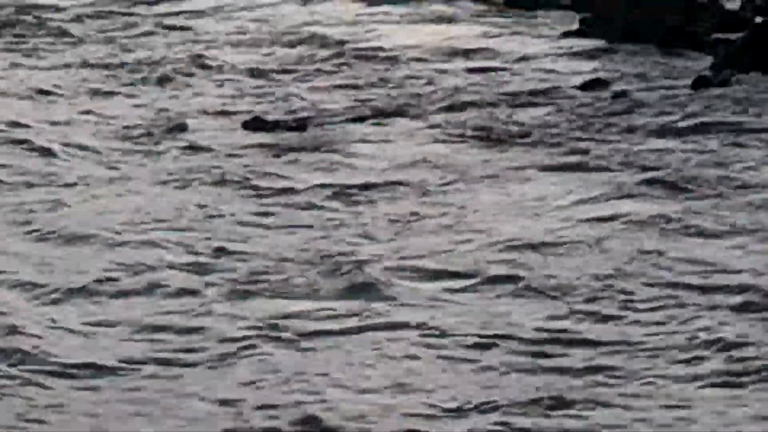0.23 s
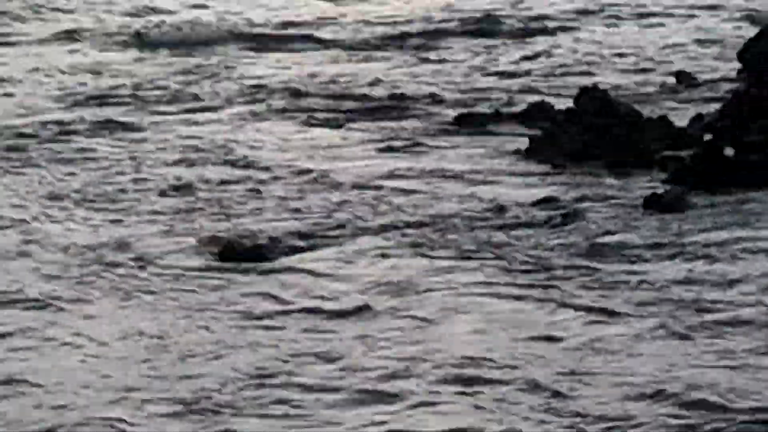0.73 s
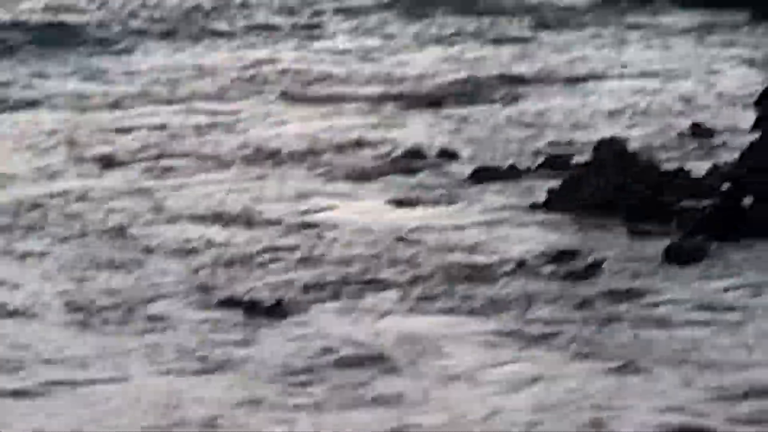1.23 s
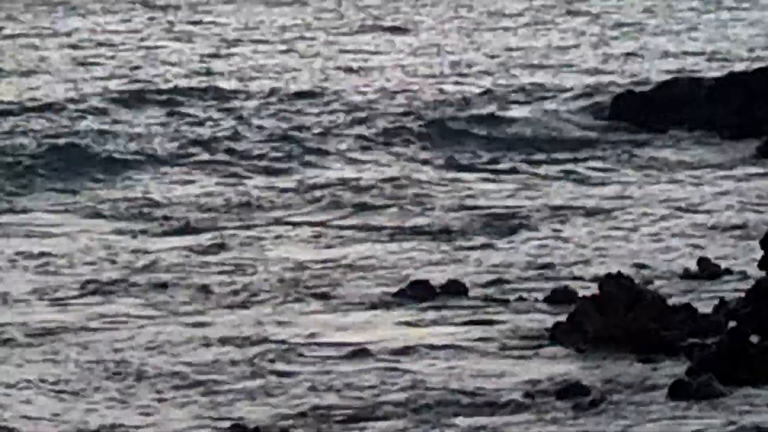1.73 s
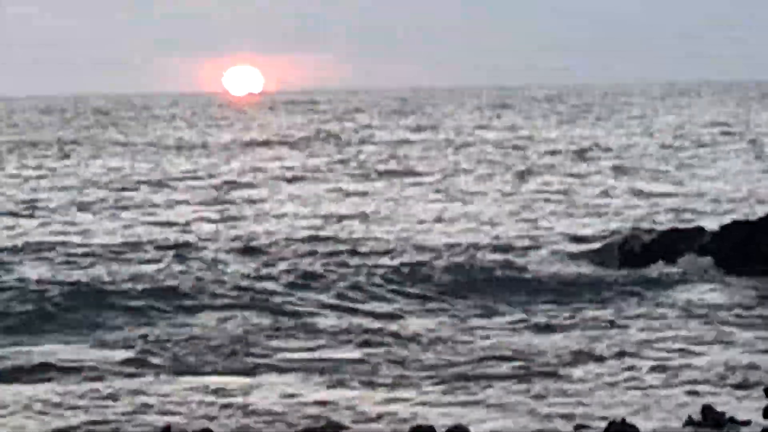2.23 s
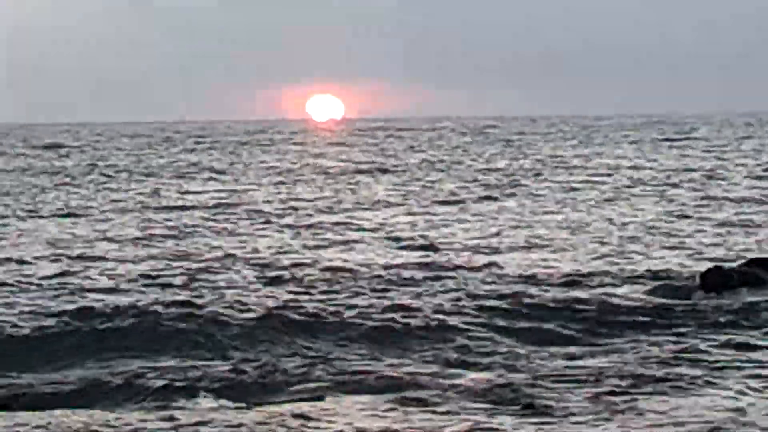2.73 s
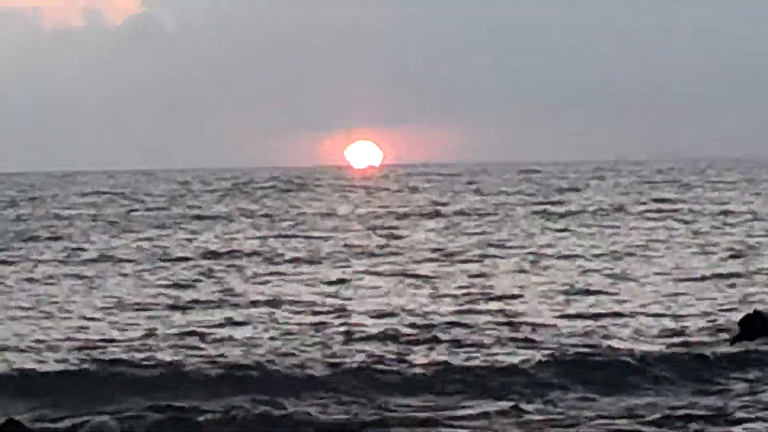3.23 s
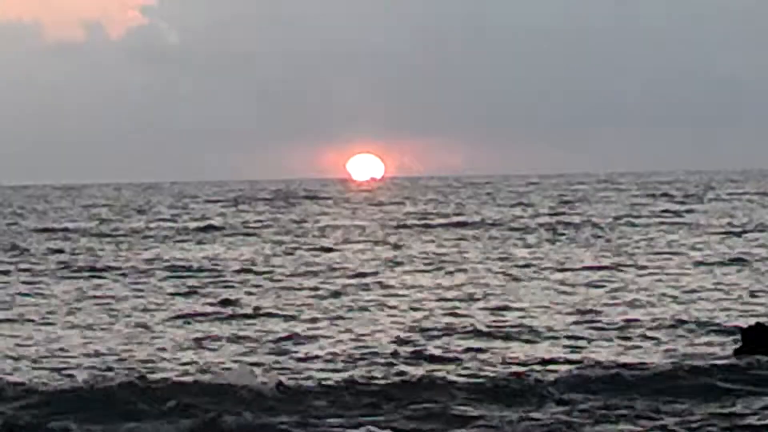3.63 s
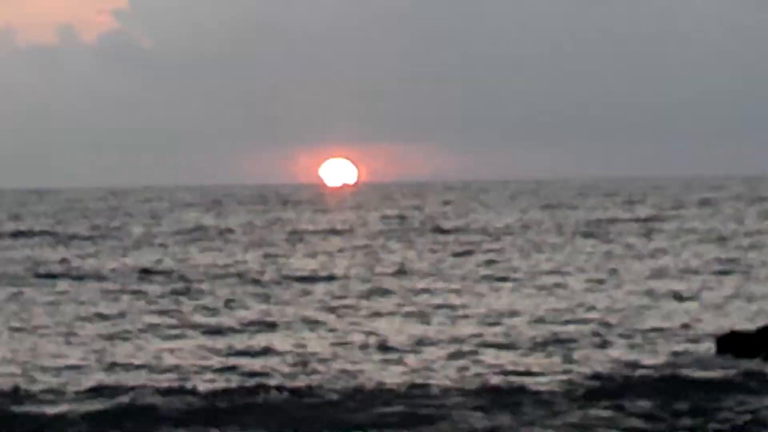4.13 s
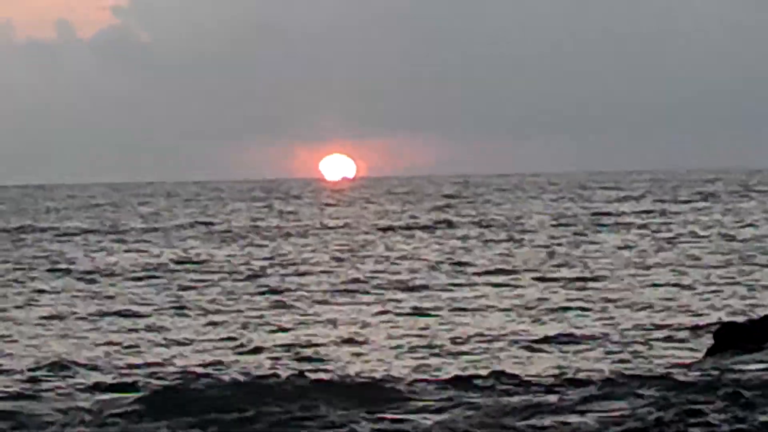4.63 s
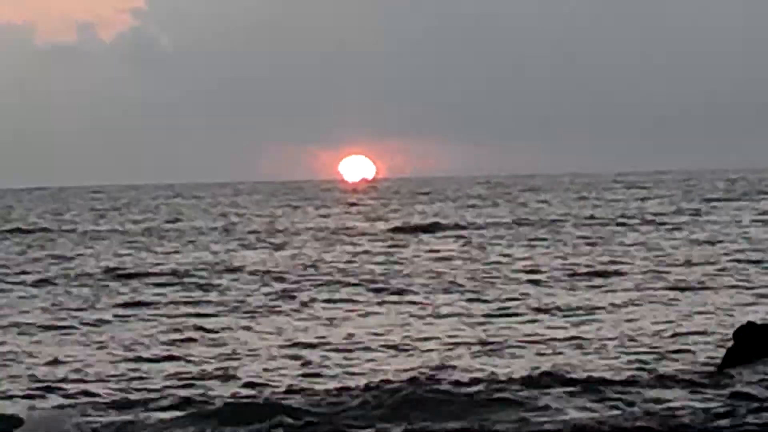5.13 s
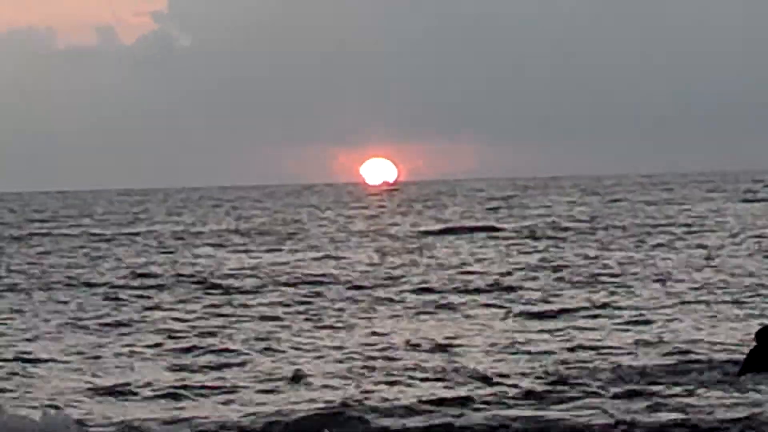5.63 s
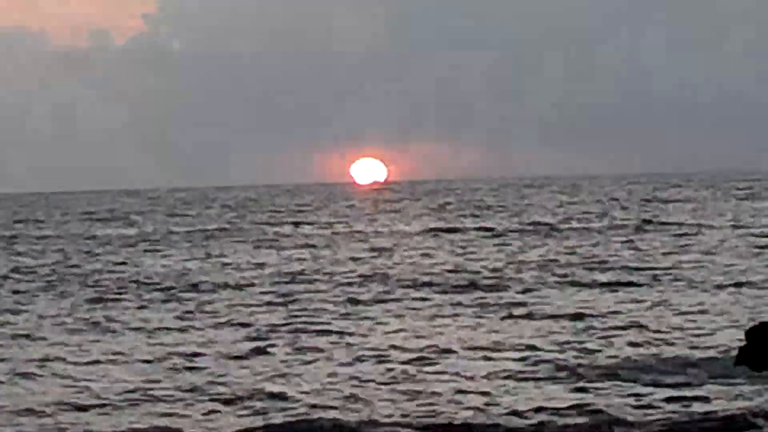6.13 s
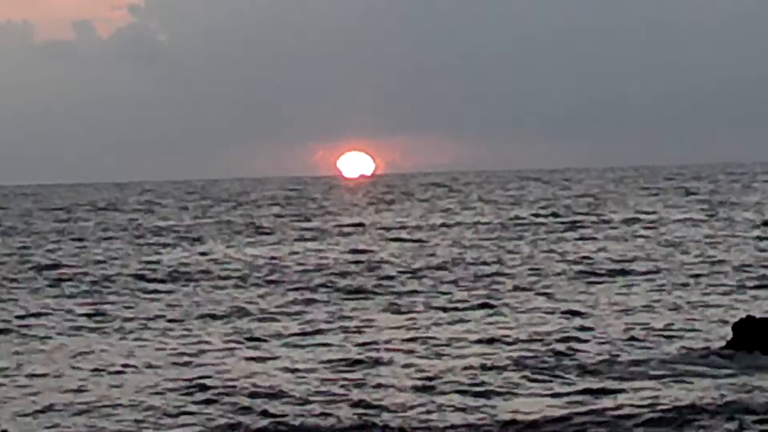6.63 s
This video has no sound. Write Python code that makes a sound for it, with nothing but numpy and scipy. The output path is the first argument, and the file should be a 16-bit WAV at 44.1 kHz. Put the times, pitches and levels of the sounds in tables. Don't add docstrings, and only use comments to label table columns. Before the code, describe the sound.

Surf on a rocky shore, heard close and wide in stereo outdoors, with only a trace of low breeze. At 0 s a strong foamy wash is already running; it sinks to a thin, bubbling trickle by 0.9 s, with faint ticks around 0.6 s. High watery drips sound at about 1.0 s and in a quick cluster at 1.75-1.85 s. A short wavelet slaps rock at 1.7 s, with another at 2.3 s; crisp ticks come at 1.9 and 2.35 s, and the sharpest at 2.86 s, after which the level ducks and recovers. Gurgling drains continue, quietest near 3.4 s with small soft plops. From 3.7 s the water gathers. A bright plop at 4.8 s, a hollow one at 5.0 s, light slaps near 5.7 s and another hollow plop at 5.9 s punctuate a growing low surge, hissing foam and fine spray, fullest around 6.4 s and still rushing at the end near 6.9 s.

```python
import sys
import numpy as np
from scipy import signal
from scipy.fft import rfft, irfft, next_fast_len
from scipy.io import wavfile
from scipy.ndimage import uniform_filter1d, map_coordinates

SR = 44100
rng = np.random.default_rng(int(sys.argv[2]) if len(sys.argv) > 2 else 0)


def wav_record(signal):
    frames = np.transpose(np.atleast_2d(signal))
    bounded = np.clip(frames, -1, 1)
    quanta = np.round(bounded * 32767).astype(np.int16)
    wavfile.write(sys.argv[1], SR, quanta)


def how_loud(loudness_db):
    steps = np.asarray(loudness_db, float) / 20
    return 10 ** steps


N = 303849

# pitch_hz, density_db
BREEZE_SPECTRUM = [(20, -17), (45, -11), (90, 0), (200, -3), (400, -20), (900, -80)]
SURGE_SPECTRUM = [(40, -30), (90, -11), (150, -2), (250, 0.5), (380, -2), (480, -8), (570, -15),
                  (750, -20.5), (1200, -90)]
WASH_SPECTRUM = [(300, -56), (500, -15.5), (620, -4), (760, -1.5), (1000, -1), (1300, -3.5), (1450, -6),
                 (1600, -26.5), (2200, -60)]
FOAM_SPECTRUM = [(900, -22), (1500, -4), (2100, -0.5), (2600, -0.5), (3200, -2), (4200, 0), (5300, 0.5),
                 (6200, -5), (7500, -18), (9000, -68), (12000, -68)]
SPRAY_SPECTRUM = [(4000, -31), (7000, 2), (8500, -1.5), (10500, 0), (13000, -3), (15500, 0), (17000, -3.5)]
# pitch_hz, difference_db, likeness_0_to_1, phase_rad
PORT_DIFFERENCE = [(100, -33, 0.3, 4.5), (220, -21, 0.93, 3.2), (390, -11, 0.9, 3), (490, -2, 0.6, 2),
                   (567, 2.5, 0.9, 3.5), (650, -3, 0.7, 0.5), (800, -8, 0.7, 0), (1100, -7.5, 1, 2.5),
                   (1400, 8, .2, 5), (1620, 1.5, .5, -0.5), (2000, 1, 0.16, 0.5), (2500, -3.5, .4, -0.5),
                   (3500, 0, .85, 0), (6500, -1, 0.7, 0), (8500, 0.5, 0.4, 0), (12000, 0, .05, -1)]
# start_s, peak_db, pitch_hz
TICKS = [(.574, -26, 6000), (.633, -32, 10500), (1.102, -23, 5000), (1.9222, -22, 5200),
         (1.9362, -21, 4600), (2.3435, -21, 3800), (2.3522, -19, 3700), (2.3585, -25, 9500),
         (2.8582, -12.5, 4300), (3.024, -31, 6500), (4.58, -34, 12000)]
# start_s, peak_db, pitch_hz
PLOPS = [
    (2.025, -25.5, 112),
    (2.05, -25.5, 614),
    (3.387, -24, 168),
    (3.424, -28, 1810),
    (4.8326, -15.5, 940),
    (5.009, -17, 267),
    (5.313, -23.5, 1210),
    (5.935, -17, 325),
]
# start_s, peak_db, pitch_hz
DRIPS = [
    (1.012, -28, 3180),
    (1.046, -32, 3140),
    (1.746, -36, 3180),
    (1.764, -28, 3030),
    (1.807, -30, 3030),
    (1.851, -26.5, 3500),
]
# start_s, drop_db
DUCKS = [
    (1.94, 2.5),
    (2.362, 4),
    (2.86, 7),
    (5.735, 2.5),
    (5.95, 4.5),
]
# start_s, length_s, lift_db
SLAPS = [
    (1.734, 0.068, 3),
    (1.897, 0.036, 0.5),
    (2.337, 0.028, 2.5),
    (5.677, 0.047, 0.5),
    (5.916, 0.025, -1),
]
# time_s, strength_db
FLOW = [(0.0, -33), (0.32, -34), (0.64, -36.5), (0.9, -40.5), (1.44, -38.5), (1.62, -41), (1.92, -37.5),
        (2.24, -39.5), (2.56, -38), (3.04, -39.5), (3.38, -41), (3.74, -36), (4.48, -37), (5.1, -35),
        (5.3, -33.5), (5.8, -33), (6.4, -32.5), (6.89, -34)]
# centre_s, lift_db
CRESTS = [
    (1.15, 1.5),
    (2.4, 2.5),
    (2.74, 1),
    (4.32, 1),
    (4.66, 0.5),
    (5.6, 0.5),
    (6.08, 2),
]
# centre_s, length_s, lift_db
GURGLES = [
    (0.157, .3, 1.5),
    (1.1, 0.35, 1),
    (1.7, 0.78, 1.5),
    (2.157, 0.97, 3),
    (3.517, 0.46, 2.5),
    (3.993, 0.77, 2.5),
    (4.4, 0.73, 2),
    (4.88, 0.57, 2.5),
    (6.502, 0.36, 1.5),
    (6.89, .3, 2.5),
]
# centre_s, lift_db
HEAVES = [(.16, 2.5), (.96, 2), (1.28, 4), (2.24, 3), (3.52, 2), (4.2, 1), (5.02, 1.5), (5.4, -0.5),
          (5.68, 1), (6.08, 2), (6.89, 2.5)]

CREST_S, HEAVE_S = 0.26, 0.41
USUAL_DB = -36
SURGE_GROWS, WASH_GROWS, SPRAY_GROWS = 0.92, 0.84, 1.08
NEARING_DB, SPRAY_RISES_DB = 0.6548, 0.14
RECOVERY_DB = 13.5
CROSS_DELAY_S = 16 / 44100
TOP_HZ = 15780


def unit(x):
    return x / np.sqrt(np.mean(x ** 2) + 1e-20)


def along(points, hz):
    f, *columns = np.transpose(points)
    return [np.interp(np.log(hz + 1), np.log(f + 1), column) for column in columns]


def filtered(x, mix):
    size = next_fast_len(N + 8192)
    spectrum = mix(rfft(x, size), np.fft.rfftfreq(size, 1 / SR))
    return irfft(spectrum, size)[..., :N]


def wobble(rate_hz):
    knots = rng.standard_normal(int(N * rate_hz / SR) + 4)
    return map_coordinates(knots, [np.arange(N) * rate_hz / SR])


def swells(times_s, lengths_s, lifts_db):
    t = np.arange(N)[:, None] / SR
    phase = np.clip((t - times_s) / lengths_s, -.5, .5)
    return np.cos(np.pi * phase) ** 2 @ lifts_db


def rush(spectrum, patchy_db, grains=0, share=0):
    z = signal.stft(rng.standard_normal((2, N)), nperseg=512)[2]
    field = rng.standard_normal(z.shape[1:])
    for axis in (0, 1):
        field = uniform_filter1d(field, size=8, axis=axis)
    patches = how_loud(patchy_db * unit(field))
    pair = unit(signal.istft(z * patches, nperseg=512)[1][:, :N])
    return unit(filtered(pair + share * grains, lambda z, hz: z * how_loud(along(spectrum, hz)[0])))


def breeze():
    return how_loud(-57) * rush(BREEZE_SPECTRUM, patchy_db=4)


def ticks():
    out = np.zeros(N + SR)
    t = np.arange(SR // 10) / SR
    late = t - .001
    for start_s, peak_db, pitch_hz in TICKS:
        pulse = np.exp(-np.abs(late) / .00007) * np.sin(2 * np.pi * pitch_hz * late)
        out[round((start_s - .001) * SR):][:len(t)] += how_loud(peak_db + 4.5) * pulse
    return out[:N]


def plops():
    out = np.zeros(N + SR)
    t = np.arange(SR // 10) / SR
    for start_s, peak_db, pitch_hz in [*PLOPS, *DRIPS]:
        life = t * pitch_hz / (2 + pitch_hz / 750)
        envelope = life ** 2 * np.exp(-2 * life)
        tone = np.sin(2 * np.pi * pitch_hz * t * (.94 + .04 * life))
        out[round(start_s * SR):][:len(t)] += how_loud(peak_db + 12) * envelope * tone
    return out[:N]


def slaps():
    t = np.arange(N) / SR
    lift_db = np.zeros(N)
    for start_s, length_s, db in SLAPS:
        rise = np.clip((t - start_s) / .015, 0, 1)
        fall = np.clip((start_s + length_s - t) / .005 + 1, 0, 1)
        lift_db += db * rise * fall
    return lift_db


def bubbles(count, hz, spread, cycles, scatter_db, size=256):
    when, pitch, loud, cloud = rng.random((count, 4)).T[:, :, None]
    t = np.arange(size) / SR
    turns = hz * np.exp(spread * (2 * pitch - 1)) * t
    life = turns / cycles
    level = how_loud(-scatter_db * np.log(loud + 0.0038))
    ring = level * life * np.exp(-3 * life) * np.sin(2 * np.pi * turns * (1 + 0.15 * life))
    at = (when * N).astype(int) + np.arange(size) + (cloud > .5) * (N + size)
    both = np.bincount(at.ravel(), ring.ravel(), 2 * (N + size))
    return unit(both.reshape(2, -1)[:, :N])


def surf():
    t = np.arange(N) / SR
    flow_db = np.interp(t, *np.transpose(FLOW)) - USUAL_DB
    crest_s, crest_db = np.transpose(CRESTS)
    heave_s, heave_db = np.transpose(HEAVES)
    foam_db = flow_db + swells(crest_s, CREST_S, crest_db)
    surge_db = SURGE_GROWS * flow_db + NEARING_DB * t + swells(heave_s, HEAVE_S, heave_db)
    wash_db = WASH_GROWS * foam_db + swells(*np.transpose(GURGLES))
    spray_db = SPRAY_GROWS * foam_db + SPRAY_RISES_DB * t
    slosh = .1 * wobble(9) + .6 * wobble(25) + .6 * wobble(70)

    surge = how_loud(surge_db - 37.0 + 0.48 * slosh) * rush(SURGE_SPECTRUM, patchy_db=0.0)
    gurgle = bubbles(count=4000, hz=934.4, spread=0.42, cycles=6.5, scatter_db=1.0, size=600)
    wash = how_loud(wash_db - 40.5 + .5 * slosh) * rush(WASH_SPECTRUM, patchy_db=-1.5, grains=gurgle, share=0.13)
    fizz = bubbles(count=16000, hz=4080, spread=0.62, cycles=3.2, scatter_db=3, size=96)
    foam = how_loud(foam_db - 37.0 + 0.52 * slosh) * rush(FOAM_SPECTRUM, patchy_db=.5, grains=fizz, share=0.22)
    crackle = bubbles(count=12000, hz=10600, spread=0.54, cycles=4.1, scatter_db=3.0, size=32)
    spray = how_loud(spray_db - 50.5 + 1.1 * slosh) * rush(SPRAY_SPECTRUM, patchy_db=.5, grains=crackle, share=.25)
    return how_loud(slaps()) * (surge + wash + foam + spray)


def ports(z, hz):
    apart_db, alike, phase = along(PORT_DIFFERENCE, hz)
    alike = np.clip(alike, 0, 1)
    common = alike * np.exp(1j * phase) * z[0]
    unrelated = np.sqrt(1 - alike ** 2) * z[1]
    apart = how_loud(apart_db) * (common + unrelated)
    return np.array([z[0] + apart, z[0] - apart])


def scene():
    splashes = (ticks() + plops()) * [[1], [0]]
    return filtered(surf() + splashes, ports) + breeze()


def widened(z, hz):
    echo = np.exp(-2j * np.pi * hz * CROSS_DELAY_S)
    weak = 0.18 + 0.52 * (hz / 12000) ** 2

    def kept(comb):
        return np.where(hz > 500, comb / (1 + (weak / (np.abs(comb) + 1e-9)) ** 4), comb)

    both = (z[0] + z[1]) / 2 * kept(1 - echo)
    apart = (z[0] - z[1]) / 2 * kept(1 + echo)
    return np.array([both + apart, both - apart]) * (hz < TOP_HZ)


def ducking():
    t = np.arange(N) / SR
    drop_db = np.zeros(N)
    for start_s, db in DUCKS:
        attack = np.clip((t - start_s) / 0.0028, 0, 1)
        drop_db += attack * np.maximum(db - RECOVERY_DB * (t - start_s), 0)
    return drop_db


def band_limit(x):
    return signal.sosfilt(signal.butter(12, 17090, fs=SR, output="sos"), x)


def record(dry):
    mix = filtered(dry, widened) * how_loud(-ducking())
    return band_limit(mix)


dry = scene()
out = record(dry)
wav_record(out)
```